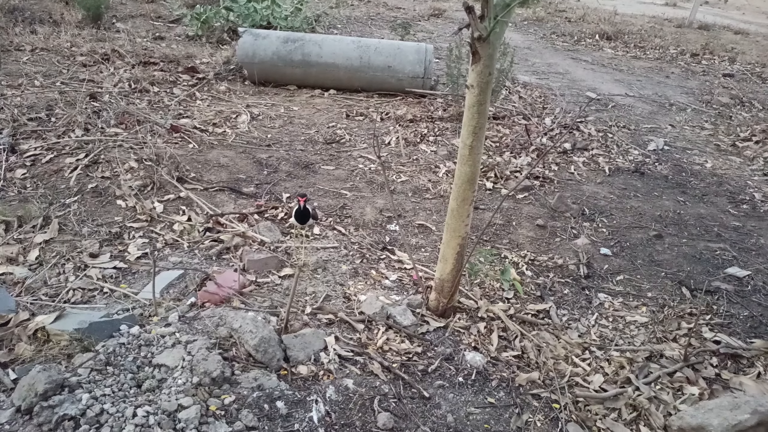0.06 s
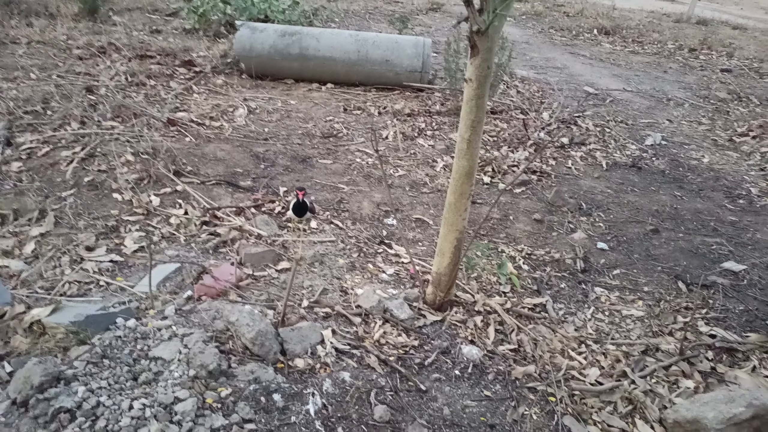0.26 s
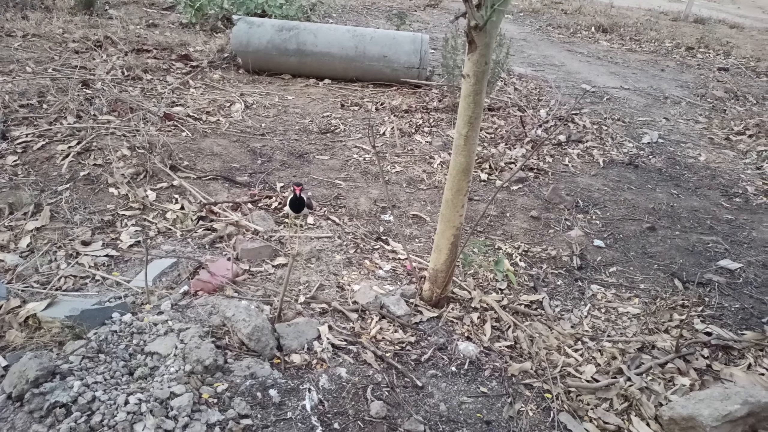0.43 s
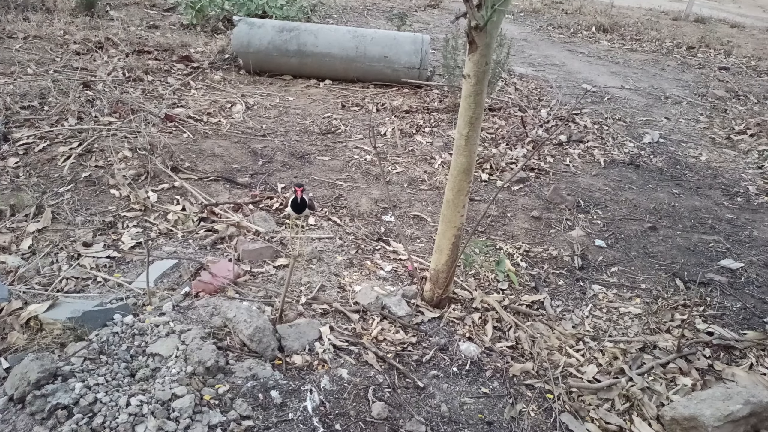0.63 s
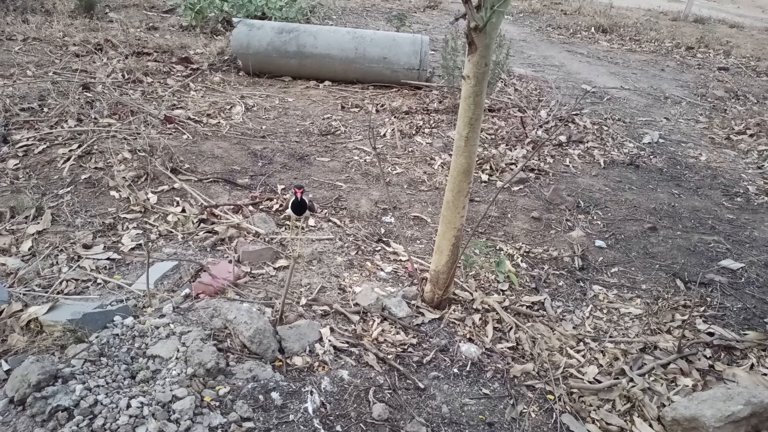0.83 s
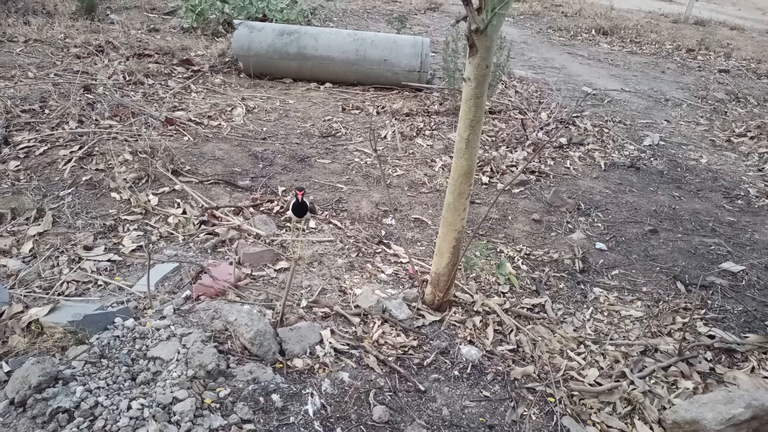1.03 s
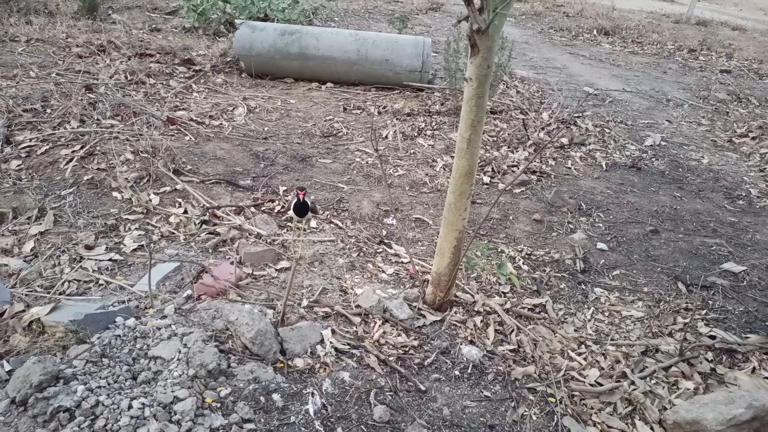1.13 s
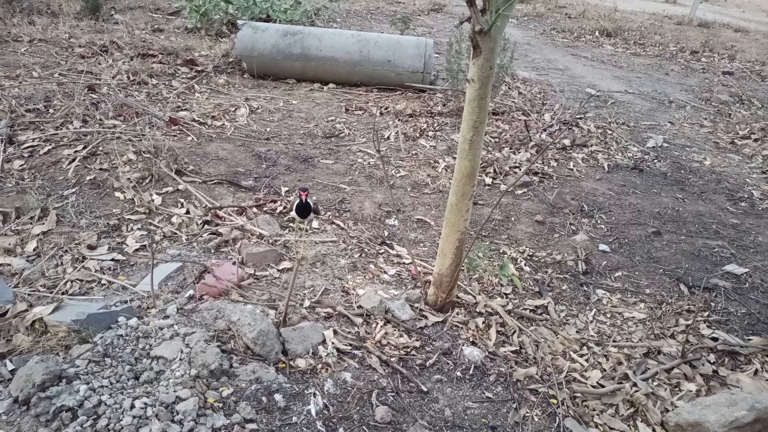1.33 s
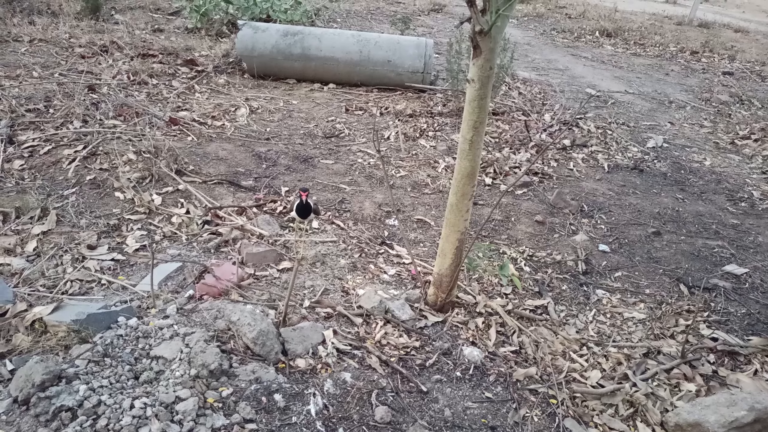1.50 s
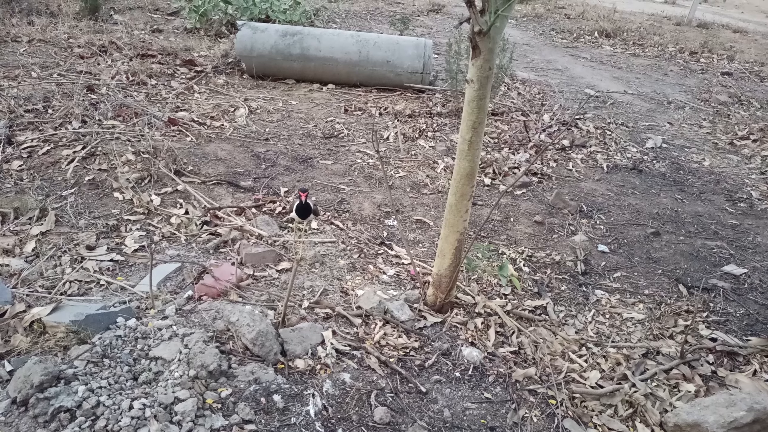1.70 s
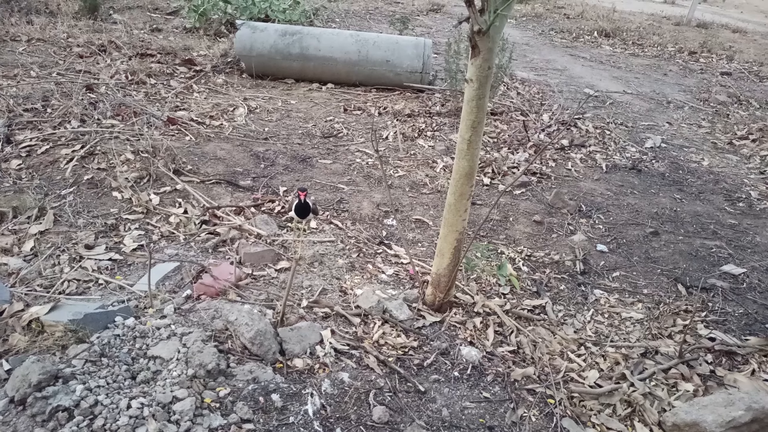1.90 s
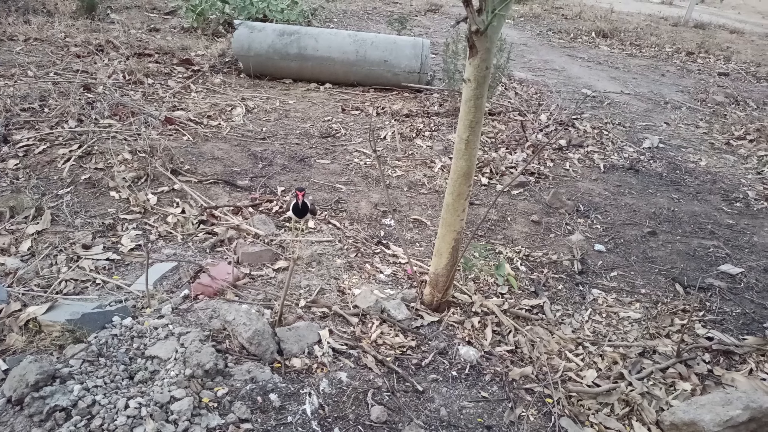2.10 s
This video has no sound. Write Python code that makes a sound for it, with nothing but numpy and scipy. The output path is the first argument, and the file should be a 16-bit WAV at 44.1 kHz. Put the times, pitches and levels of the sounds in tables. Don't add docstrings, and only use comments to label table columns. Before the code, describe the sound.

Three loud, raspy lapwing cries, each flipping upward in pitch, ring outdoors above quiet cicadas and distant birds.

```python
import sys
import numpy as np
from scipy import signal
from scipy.fft import rfft, irfft
from scipy.io import wavfile
from scipy.ndimage import uniform_filter1d

SR = 44100
rng = np.random.default_rng(int(sys.argv[2]) if len(sys.argv) > 2 else 0)


def unload_wav(signal):
    wavfile.write(
        sys.argv[1],
        SR,
        np.round(np.clip(np.atleast_2d(signal).T, -1, 1) * 32767).astype(np.int16),
    )


def voltage_ratio(decibels):
    exponent = np.asarray(decibels, float) / 20
    return 10 ** exponent


N = 94815

# f/Hz, level/dB per Hz
CICADA = [(3820, -70.5), (6500, -55), (6840, -53), (7090, -29.5), (7470, -18), (8100, -11.5), (8840, 1.5),
          (9790, -9), (10200, -39.5), (13300, -54), (22000, -120)]
# f/Hz, level/dB per Hz
AIR = [(20, -44), (45, -19), (90, -4), (200, -10.5), (800, -21.5), (2000, -28.5), (4500, -37.5),
       (7000, -43)]
# start t/s, length t/s, from f/Hz, to f/Hz, level/dB
CLEAR_WHISTLES = [(.0, 0.063, 3870, 3750, -76), (0.059, 0.062, 3500, 3480, -69),
                  (0.101, 0.061, 3350, 3120, -70.5), (0.144, 0.05, 1000, 1000, -70.5),
                  (0.501, .24, 2700, 2757, -64.5), (1.128, .08, 2000, 2040, -67),
                  (1.2, 0.23, 1850, 1730, -72), (1.158, 0.13, 2800, 2657, -65),
                  (1.301, 0.052, 2950, 2950, -70), (1.301, .12, 2164, 2304, -72.5),
                  (1.38, .07, 3700, 3600, -79.5), (1.93, .12, 2310, 2250, -57),
                  (2.021, .13, 2793, 2700, -61.5)]
# start t/s, length t/s, from f/Hz, to f/Hz, level/dB
SMEARED_WHISTLES = [
    (.0, 0.0735, 2200, 2480, -55.5),
    (.07, .1, 1980, 2140, -67),
    (0.388, 0.056, 2300, 2240, -56),
    (.9, .2, 2250, 2155, -58.5),
    (1.119, .2, 2406, 2306, -66.5),
    (1.799, 0.102, 2196, 2114, -56),
    (1.899, 0.096, 2100, 1907, -60.5),
    (2.001, .15, 2005, 2200, -59.5),
]
# start t/s, length t/s, from f/Hz, to f/Hz, level/dB
LONG_WHISTLE = (1.52, .275, 2470, 2501, -65.5)

# start t/s, first flutter beat t/s, beat period t/s, high register from t/s, end t/s
CALL_TIMES = [
    (0.2009, 0.2287, .0076, .2650, .2870),
    (0.7411, .7680, .0075, .8125, .8380),
    (1.6554, 1.6844, .0080, 1.7070, 1.7350),
]
CALL_DB = [-15.5, -15.5, -15.5]
CLEARING_S = [0.0063, .009, .016]
LOW_DB = [-15.5, -3.5, -6, -1.5, 2.86, -5, -14.5, -15, -13.5, -18, -15.5, -14]
HIGH_DB = [-13.5, -11.5, -2.5, 1.43, -15, -13, -12.5, -19.5, -15]
BEAT_TONE_DB = [-37, -20.5, -6, 1.13, -13, -13, -13, -16.5, -12.5]
# f/Hz, level/dB per Hz
RASP = [(900, -39.5), (2100, -23), (2700, -6.5), (3400, -9), (4490, -14.5), (6700, -4), (8050, -14.5),
        (15500, -16.5)]

# f/Hz, t60 t/s
ECHO_T60 = [(1200, 0.06), (2600, 0.87), (4000, 0.44), (5000, 0.5253), (7000, 0.3745), (11000, 0.01),
            (16000, 0.03)]
# f/Hz, level/dB
ECHO_TONE = [(1000, -17.5), (1700, 1.5), (2100, -2.5), (3200, 3.5), (4400, -13), (5000, -2), (7000, -2.5),
             (16000, -7.5)]
# f/Hz, left minus right level/dB
PORTS = [(1290, 5.5), (2380, 3), (4400, -1.1), (8120, 4.5), (11000, 10.5), (15000, 6.5)]
# f/Hz, phase by which the left leads after its lag [rad]
PORT_PHASE = [(1800, 1.24), (2330, -0.97), (3400, -1.72), (4700, -0.8), (5400, 0.68), (9000, -0.3),
              (14800, 4.5), (16600, 3)]

CICADA_DB, CICADA_PAN_DB, AIR_DB, AIR_PAN_DB = -58.5, 3.5, -76.5, 9
CLEAR_WIDTH_HZ, SMEARED_WIDTH_HZ, WHISTLE_WIDTH_HZ = 100, 445, 60
WHISTLE_STEADY, FAR_PAN_DB = 0.8, 13.5

LOW_HZ, LOW_RISE, RISE_S, RISE_CURVE = 1277.4, .085, .066, 1.352
HIGH_HZ, HIGH_ARCH, HIGH_SAG, BEAT_GLIDE, JITTER = 1669.3, 0.01783, 0.036, .03, 0.01437
LOW_TWIST, HIGH_TWIST = 0.27, 0.501
ATTACK_S, RELEASE_S, SETTLE_S, SETTLE_DB = .0021, 0.0076, 0.0099, -5
LOW_LEVEL_DB, SWELL_DB, DULL_DB, FLUTTER_DULL_DB = -2.5, -2.5, -5, -10.5
BEAT_WIDTH, BEAT_LEAN, BEAT_DUCK, BEAT_SCATTER_S = .33, .12, 0.67, .00015
BEAT_DB, BEAT_FADE_DB, BEAT_FLARE_DB, BEAT_SCATTER_DB = 3.5, -.5, 5, .8
RASP_DB, RASP_BEAT_DB, RASP_FLUTTER_DB = -22.5, -13, -11

RASP_IN_ECHO, ECHO_DB, ECHO_HOLD_S, ECHO_PAN_DB = 0.81, -17, 0.12379, 7.5
WALL_S, WALL_DB, WALL_WIDTH_S = 0.18, 7.5, 0.034
LEFT_LAG = 53
SQUARE_LEFT, SQUARE_RIGHT, RECTIFY_POWER = 2.99, 1, 2.695
COUPLING_HZ, SQUARE_TOP_HZ, EDGE_HZ, CEILING = 65.4, 510, 15950, 1.1


def evened(x):
    return x / np.sqrt(np.mean(x ** 2) + 1e-20)


def read(points, hz):
    f, value = np.transpose(points)
    return np.interp(np.log(hz + 1), np.log(f + 1), value)


def coloured(x, points, share=1, turn=0):
    hz = np.fft.rfftfreq(x.shape[-1], 1 / SR)
    gain = voltage_ratio(share * read(points, hz))
    rotation = np.exp(1j * turn * read(PORT_PHASE, hz))
    return irfft(rfft(x) * gain * rotation, x.shape[-1])


def ramp(x):
    return np.sin(np.pi / 2 * np.clip(x, 0, 1)) ** 2


def hiss(points, level_db, pan_db, patchy_db):
    drift = evened(uniform_filter1d(rng.standard_normal((2, N)), size=900))
    noise = evened(coloured(rng.standard_normal((2, N)), points)) * voltage_ratio(patchy_db * drift)
    middle_db = level_db + 2.5
    return noise * voltage_ratio([[middle_db + pan_db / 2], [middle_db - pan_db / 2]])


def whistle(length, from_hz, to_hz, db, width_hz, steady):
    count = int(length * SR)
    noise = rng.standard_normal(size=(2, 2, 16000))
    pole = np.exp(-np.pi * width_hz / SR)
    blur = signal.lfilter([1], np.poly([pole, pole]), noise[0] + 1j * noise[1])[:, -count:]
    blur = blur / np.sqrt(np.mean(abs(blur) ** 2)) + steady
    turns = np.cumsum(np.linspace(from_hz, to_hz, count)) / SR
    tone = evened((blur * np.exp(2j * np.pi * turns)).real)
    swell = np.sin(np.linspace(0, np.pi, count)) ** .5
    return tone * swell * voltage_ratio([[db + FAR_PAN_DB / 2], [db - FAR_PAN_DB / 2]])


def far_birds():
    out = np.zeros((2, N))
    rows = [(*row, CLEAR_WIDTH_HZ, 0) for row in CLEAR_WHISTLES]
    rows += [(*row, SMEARED_WIDTH_HZ, 0) for row in SMEARED_WHISTLES]
    rows += [(*LONG_WHISTLE, WHISTLE_WIDTH_HZ, WHISTLE_STEADY)]
    for start, *voice in rows:
        tone = whistle(*voice)
        at = max(round(start * SR), 0)
        out[:, at:at + tone.shape[1]] += tone[:, :N - at]
    return out


def stack(hz, levels_db, twist):
    turns = np.cumsum(hz) / SR
    return sum(voltage_ratio(db) * np.cos(2 * np.pi * (k + 1) * turns - twist * k ** 2)
               for k, db in enumerate(levels_db))


def call(start, first, period, switch, end, clearing, level_db):
    t = np.arange(start, end + 0.0085, 1 / SR)
    noise = rng.standard_normal((5000, 2))[:len(t)].T
    chance = rng.standard_normal((30, 2))

    phase = (t - first) / period
    number = np.round(phase).astype(int)
    off = phase - number + BEAT_SCATTER_S / period * chance[number, 0]
    held = ramp((t - switch) / 0.006 + .5)
    settled = ramp((t - switch) / clearing) ** 2
    flutter = ramp(phase / 1.07 + 0.93) * (1 - held)

    def pulse(at):
        return np.exp(-.5 * ((off - at) / BEAT_WIDTH * 2) ** 2) * (1 - held)

    beat = pulse(0) * voltage_ratio(BEAT_SCATTER_DB * chance[number, 1] + BEAT_FADE_DB * number)
    beat *= np.where(number < 0, 0.24 * (number == -1), 1)

    wobble = 1 + JITTER * evened(uniform_filter1d(noise[0], size=60)) * (0.24 + flutter)
    low_hz = LOW_HZ * (1 + LOW_RISE * ((t - start) / RISE_S) ** RISE_CURVE) * wobble
    u = np.clip((t - switch) / (end - switch), 0, 1.2)
    bend = HIGH_ARCH * np.sin(np.pi * u) - HIGH_SAG * u ** 3 - BEAT_GLIDE * off * (1 - held)
    high_hz = HIGH_HZ * (1 + bend) * wobble

    dull = DULL_DB * ramp((t - start) / (first - start)) + FLUTTER_DULL_DB * flutter
    dull = dull + BEAT_FLARE_DB * np.minimum(beat, 1) - 12 * held
    duck = 20 * np.log10(1 - BEAT_DUCK * pulse(BEAT_LEAN) * (number >= -1))
    low_tone_db = [db + dull * (k > 1) + duck * (k == 1) for k, db in enumerate(LOW_DB)]
    low = stack(low_hz, low_tone_db, LOW_TWIST)
    settle = ramp((t - start - ATTACK_S) / SETTLE_S) * (1 - ramp(phase + 1))
    low *= voltage_ratio(LOW_LEVEL_DB + SETTLE_DB * settle) * (1 - settled)

    high_tone_db = [a + (b - a) * settled for a, b in zip(BEAT_TONE_DB, HIGH_DB)]
    high_level = voltage_ratio(BEAT_DB) * beat + held * voltage_ratio(SWELL_DB * u ** 2)
    high = stack(high_hz, high_tone_db, HIGH_TWIST) * high_level

    rasp_level = voltage_ratio(RASP_DB) + voltage_ratio(RASP_BEAT_DB) * beat
    rasp_level = rasp_level + voltage_ratio(RASP_FLUTTER_DB) * ramp(phase / 2.1 + 1) * (1 - settled)
    rasp = rasp_level * evened(coloured(noise[1], RASP))

    shape = ramp((t - start) / ATTACK_S) * ramp((end + 0.0026 - t) / RELEASE_S)
    return voltage_ratio(level_db) * shape * np.array([low + high, rasp])


def echo(x):
    hz, t, z = signal.stft(rng.standard_normal((2, SR)), SR, nperseg=256)
    fall = -60 * np.maximum(t - ECHO_HOLD_S, 0) / read(ECHO_T60, hz)[:, None]
    wall = WALL_DB * np.exp(-.5 * ((t - WALL_S) / WALL_WIDTH_S) ** 2) * (hz < 4500)[:, None]
    tail_db = fall + wall + read(ECHO_TONE, hz)[:, None]
    tail = signal.istft(z * voltage_ratio(tail_db), SR, nperseg=256)[1]
    onset = ramp(np.arange(tail.shape[1]) / SR / .004 - 1)
    tail = tail * onset / np.linalg.norm(tail[0])
    wet = signal.fftconvolve(x[None], tail, axes=1)[:, :N]
    return wet * voltage_ratio([[ECHO_DB], [ECHO_DB - ECHO_PAN_DB]])


def scene():
    background = hiss(CICADA, CICADA_DB, CICADA_PAN_DB, patchy_db=0.9) + far_birds()
    background += hiss(AIR + [(9000, -94)], AIR_DB, AIR_PAN_DB, patchy_db=0.4)
    parts = np.zeros((2, N))
    for row, clearing, db in zip(CALL_TIMES, CLEARING_S, CALL_DB):
        sound = call(*row, clearing, db)
        at = round(row[0] * SR)
        parts[:, at:at + sound.shape[1]] += sound
    bird = parts.sum(0)
    left = coloured(np.roll(bird, LEFT_LAG), PORTS, 0.4, turn=0.85)
    right = coloured(bird, PORTS, -0.81)
    return np.array([left, right]) + echo(parts[0] + RASP_IN_ECHO * parts[1]) + background


def roll_off(x):
    return signal.sosfilt(signal.butter(12, 17050, fs=SR, output="sos"), x)


def record(dry):
    thump = abs(dry) ** RECTIFY_POWER
    thump = signal.lfilter(*signal.butter(2, COUPLING_HZ, "high", fs=SR), thump)
    thump = signal.lfilter(*signal.butter(2, SQUARE_TOP_HZ, fs=SR), thump)
    thump = thump * np.array([[SQUARE_LEFT], [SQUARE_RIGHT]])
    heard = CEILING * np.tanh((dry - thump) / CEILING)
    heard = signal.sosfilt(signal.ellip(6, .3, 26, EDGE_HZ, fs=SR, output="sos"), heard)
    return roll_off(heard)


dry = scene()
out = record(dry)
unload_wav(out)
```